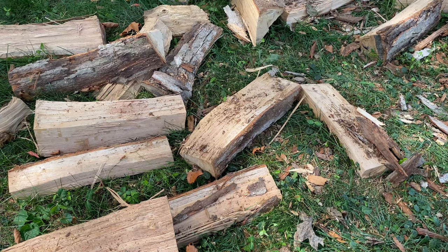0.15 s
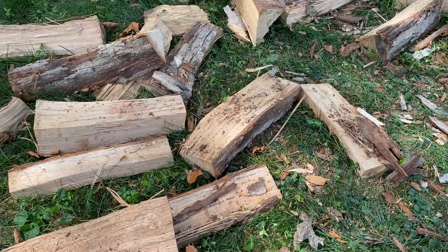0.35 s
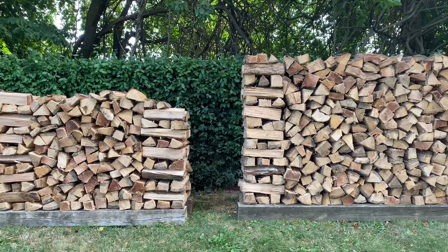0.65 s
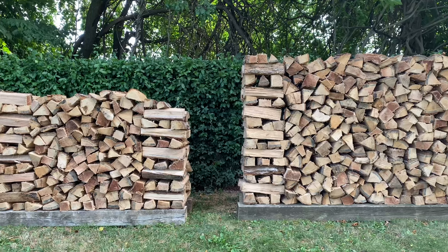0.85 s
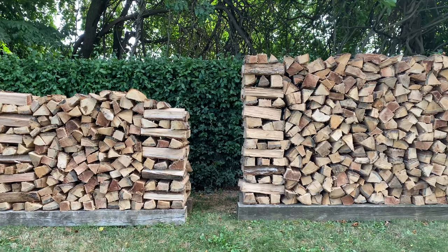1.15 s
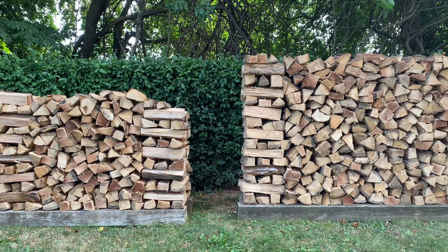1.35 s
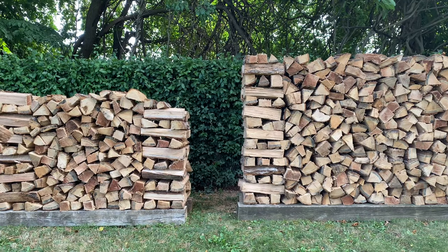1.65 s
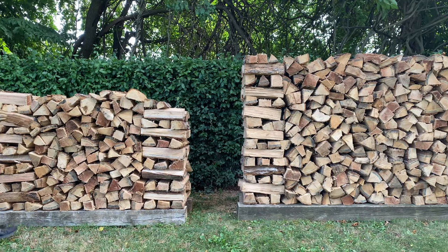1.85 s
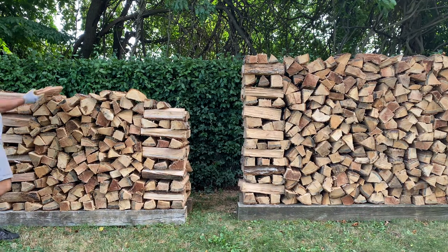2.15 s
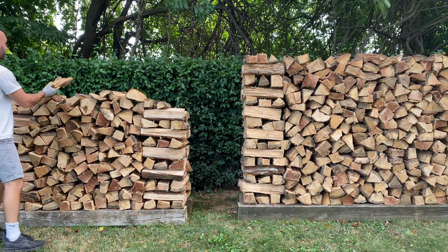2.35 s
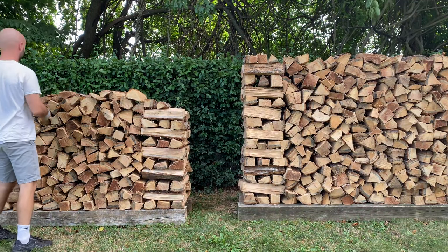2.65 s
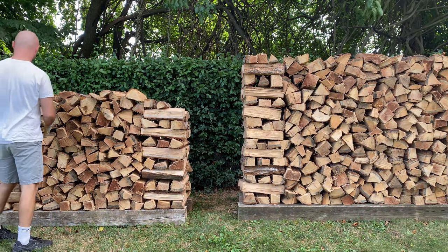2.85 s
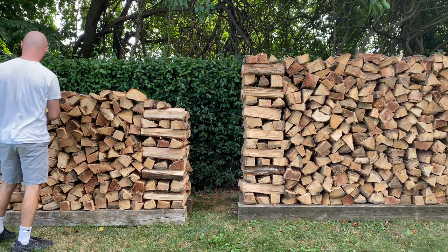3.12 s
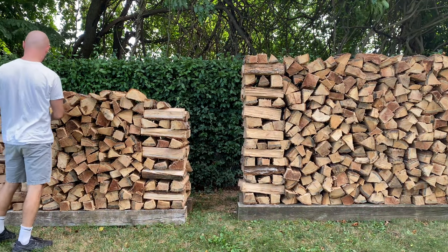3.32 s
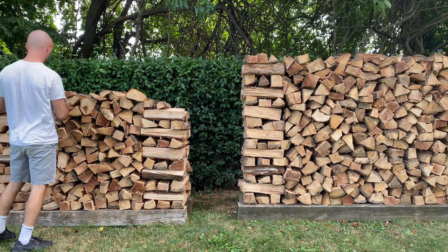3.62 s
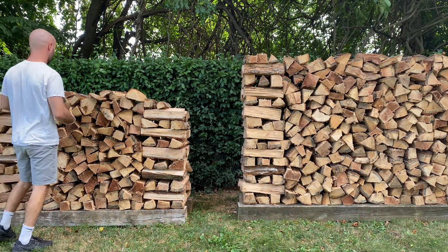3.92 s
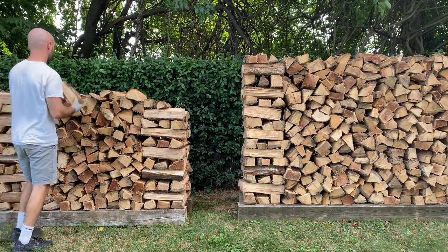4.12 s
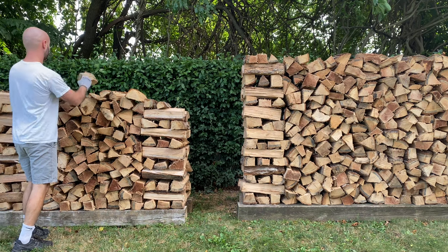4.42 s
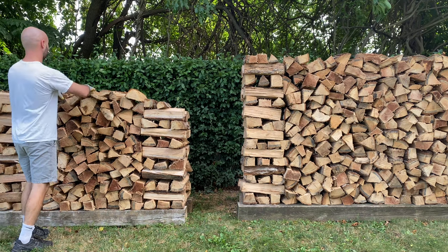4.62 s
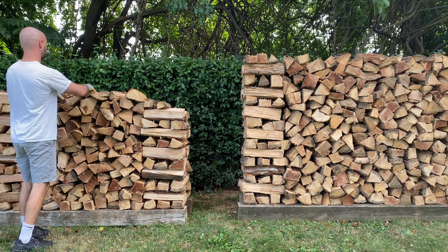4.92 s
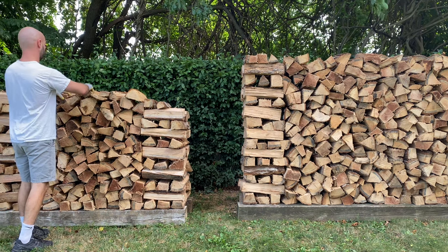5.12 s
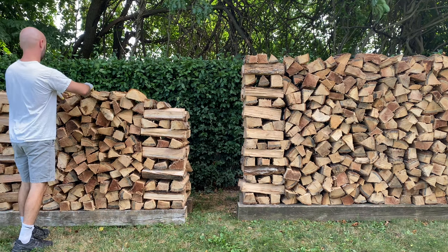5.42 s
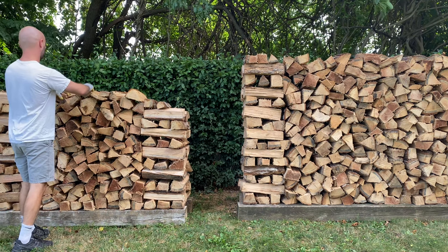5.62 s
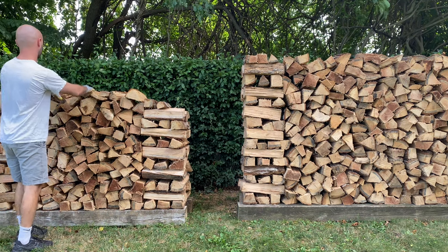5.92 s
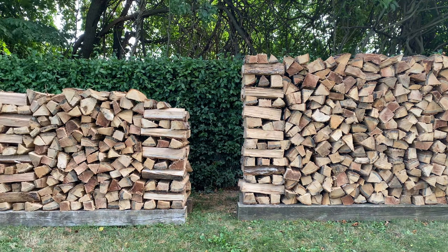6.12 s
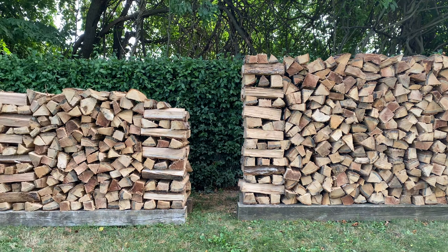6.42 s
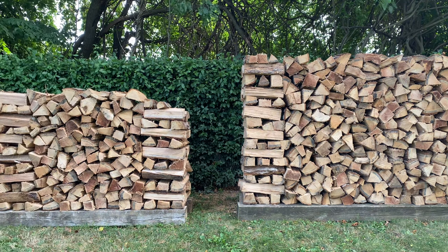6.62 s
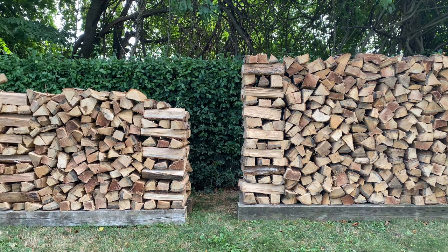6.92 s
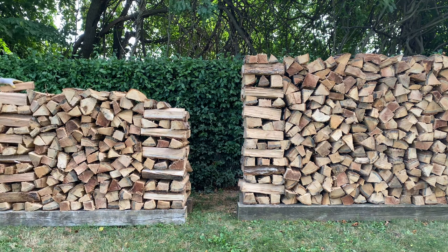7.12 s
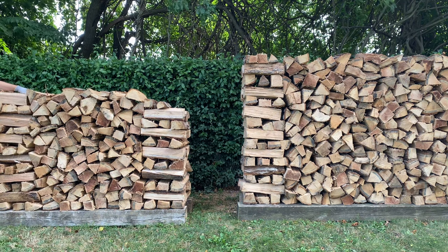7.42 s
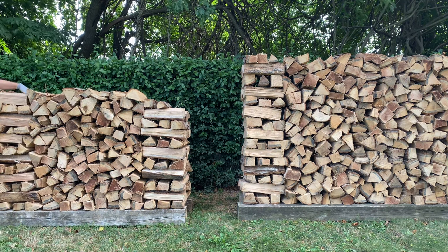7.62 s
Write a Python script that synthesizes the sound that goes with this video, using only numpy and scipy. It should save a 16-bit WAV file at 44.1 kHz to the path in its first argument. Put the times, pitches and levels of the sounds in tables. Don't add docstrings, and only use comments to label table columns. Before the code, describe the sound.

A dense, loud tumble of firewood opens: hollow clunks, low ground thuds and dry bark ticks. It stops abruptly into soft garden ambience in stereo, with passing cars and a labouring lorry that fade, high cricket trills and thin descending whistles. Wood is placed on a pile at some distance, lightly then more sharply. Finally come grass rustles, snaps, clearer birds and buffeting wind.

```python
import sys
import numpy as np
from scipy import signal
from scipy.fft import rfft, irfft, next_fast_len
from scipy.io import wavfile
from scipy.ndimage import uniform_filter1d, map_coordinates

SR = 44100
rng = np.random.default_rng(int(sys.argv[2]) if len(sys.argv) > 2 else 0)


def nominal_scale(level):
    x = np.asarray(level, float) / 20
    return 10 ** x


def dump(signal):
    limited = np.clip(np.atleast_2d(signal).T, -1, 1)
    pcm = np.round(limited * 32767).astype(np.int16)
    wavfile.write(sys.argv[1], SR, pcm)


N = 342127

# t/s, level/dB
LORRY_SWING = [
    (.59, 5),
    (1.15, -4),
    (1.75, 1),
    (3.15, 0.5),
    (3.45, -9.5),
    (4.9, -10.5),
    (6.1, -9.5),
]
# t/s, level/dB
CARS_SWING = [
    (.59, 2),
    (2.1, 0.5),
    (2.9, -3),
    (3.66, -1.5),
    (4.2, -2.5),
    (4.45, -5.5),
    (6.1, -13.5),
]
# t/s, length/s, level/dB
WIND_GUST = (7.3, 0.1, -26)


def unit(x):
    return x / np.sqrt(np.mean(x ** 2) + 1e-20)


def along(points, hz):
    f, v = np.transpose(points)
    return np.interp(np.log(hz + 1), np.log(f + 1), v, -120, -120)


def curves(rows):
    s, *cols = np.transpose(rows)
    return [np.interp(np.arange(N) / SR, s, c) for c in cols]


def wobble(rate):
    knots = rng.standard_normal(int(N * rate / SR) + 4)
    return map_coordinates(knots, [np.arange(N) * rate / SR])


def filtered(x, response):
    m = next_fast_len(N + 8192)
    return irfft(rfft(x, m) * response(np.fft.rfftfreq(m, 1 / SR)), m)[..., :N]


def ports(pair):
    # f/Hz, phase/rad
    right_leads = [(0, 0), (2410, -7), (2840, -6.5), (3450, -6.5), (6720, -6), (8100, -5), (9560, -2.5),
                   (15200, 8)]

    def shift(hz):
        phase = np.interp(hz, *np.transpose(right_leads))
        return np.exp(.5j * np.outer([-1, 1], phase))
    return filtered(pair, shift)


def lead(x, samples):
    return filtered(x, lambda hz: np.exp(1j * np.pi * np.outer([1, -1], hz) * samples / SR))


def rush(spectrum, alike, patchy_db):
    z = signal.stft(rng.standard_normal((2, N)), nperseg=512)[2]
    field = uniform_filter1d(rng.standard_normal(z.shape[1:]), 5, 0)
    field = uniform_filter1d(field, 12, 1)
    a, b = signal.istft(z * nominal_scale(patchy_db * unit(field)), nperseg=512)[1][:, :N]
    turn = np.arccos(np.clip(alike, 0, 1)) / 2
    pair = np.cos(turn) * a + np.sin(turn) * np.outer([1, -1], b)
    return unit(filtered(pair, lambda hz: nominal_scale(along(spectrum, hz))))


def add(track, s, sound):
    part = track[..., round(s * SR):round(s * SR) + sound.shape[-1]]
    part += sound[..., :part.shape[-1]]


def by_shot(*values):
    changes = (.556, 6.121)
    return np.choose(np.searchsorted(changes, np.arange(N) / SR), values)


def layer_db(levels, swing_db=0):
    first_db, settling, far_db, last_db = levels
    return by_shot(first_db - settling * np.arange(N) / SR, far_db + swing_db, last_db)


def swells(rows):
    t = np.arange(N) / SR
    return sum(nominal_scale(row[-1]) * np.exp(-((t - row[0]) / row[1]) ** 2) for row in rows)


def lows():
    # f/Hz, level/dB per Hz
    rumble_spectrum = [(15, -52), (30, -23.5), (48, -3.5), (70, -1), (110, -6), (160, -34), (300, -63)]
    drone_spectrum = [(70, -19), (130, 2), (200, -1.5), (270, -8.5), (350, -21), (800, -60)]
    rumble_levels = (-29, 10.5, -53.5, -40.5)
    drone_levels = (-25, 26.5, -50, -48)
    lorry_db, gust = curves(LORRY_SWING)[0], swells([WIND_GUST])
    rumble = nominal_scale(layer_db(rumble_levels, 0.19 * lorry_db)) + gust
    rumble = rumble * nominal_scale(4.0 + 3.6 * wobble(9)) * rush(rumble_spectrum, 0.9, patchy_db=0.86)
    drone = nominal_scale(layer_db(drone_levels, lorry_db) + 1.5) + nominal_scale(-12) * gust
    return rumble + drone * rush(drone_spectrum, 0.9, patchy_db=0.0)


def traffic():
    # f/Hz, level/dB per Hz
    roar_spectrum = [(200, 0), (400, -4.5), (800, 1), (1200, 0), (1700, -14.5), (3000, -29.5)]
    tyre_spectrum = [(700, -6), (1300, 3.5), (1900, -0.5), (2500, -7), (2900, -19), (5000, -22)]
    roar_levels = (-39.5, 36, -56.5, -51)
    tyre_levels = (-48, 46, -54, -60.5)
    # t/s, length/s, tyre centre f/Hz, level/dB
    passing = [
        (0.621, 0.66, 1027, -48),
        (1.806, 0.55, 998, -50),
        (3.049, 0.5, 847, -49.5),
        (3.707, 0.16, 1090, -69),
    ]
    likeness = (0.81, 0.71, 0.65)
    alike = by_shot(*likeness)
    hz = curves([(s, centre) for s, _, centre, _ in passing])[0]
    band = rush([(1, -1.5), (80, -13.0), (200, -13.0)], alike=0.86, patchy_db=-1.5)
    car = np.cos(2 * np.pi * np.cumsum(hz) / SR) * band
    roar = nominal_scale(layer_db(roar_levels, 0.47 * curves(LORRY_SWING)[0])) * rush(roar_spectrum, alike, patchy_db=2.0)
    tyre_gain = nominal_scale(layer_db(tyre_levels, curves(CARS_SWING)[0]) + 4.0)
    return nominal_scale(4.5) * (roar + swells(passing) * car) + tyre_gain * rush(tyre_spectrum, alike, patchy_db=1.0)


def leaves():
    # f/Hz, level/dB per Hz
    hiss_spectrum = [(300, 8), (1500, -6.5), (3000, -1.5), (5500, -4), (8000, -7.5), (9500, -9),
                     (16000, -14.5)]
    hiss_levels = (-53.5, -0.5, -68, -53.5)
    gain = nominal_scale(layer_db(hiss_levels, 0.2 * curves(CARS_SWING)[0]) + 8)
    return gain * rush(hiss_spectrum, alike=0.094, patchy_db=1.23)


def grass():
    # f/Hz, level/dB per Hz
    rustle_spectrum = [(1500, -13), (4000, -5.5), (8000, -7.5), (11000, -4), (14000, -4.5), (16000, -3)]
    rustle_levels = (-69, 3, -75, -62)
    # t/s, length/s, level/dB
    steps = [(.48, 0.029, -49), (.8, 0.13, -73), (1.3, .05, -81), (2.32, 0.099, -72), (2.51, 0.04, -74),
             (2.92, 0.087, -72), (4.15, 0.16, -80), (4.582, 0.0094, -53), (5.3, 0.54, -88),
             (6.02, 0.1, -76), (6.6, 0.087, -52), (6.84, 0.11, -50), (7.3, 0.04, -59), (7.47, 0.029, -69)]
    grains = 1 + 0.2 * np.abs(wobble(300)) ** 1.8 * nominal_scale(1.8 * wobble(30))
    rustle = unit(grains * rush(rustle_spectrum, alike=0.45, patchy_db=1.5))
    return (nominal_scale(layer_db(rustle_levels)) + swells(steps)) * nominal_scale(4.5) * rustle


def motor():
    # t/s, level/dB
    load = [(.6, -45.5), (1.05, -48), (1.2, -48), (1.36, -37), (1.8, -44.5), (2, -38), (3.2, -43),
            (4.5, -50), (5.25, -52.5), (5.4, -45), (6, -48), (6.15, -55), (6.3, -38.5), (7.76, -58)]
    hz = 110.6 * (1 + 0.0065 * wobble(5))
    turn = 2 * np.pi * np.cumsum(hz) / SR
    tone = np.sin(turn) + nominal_scale(-21) * np.sin(turn / 2)
    tone += nominal_scale(-17.0 + 1.5 * wobble(2.95)) * np.sin(turn * 3 / 2)
    return nominal_scale(curves(load)[0] + 0.31 * wobble(12)) * tone * nominal_scale([[-.6], [.6]])


def gate(per_s, at_s, quickens, sharp):
    since = np.arange(N) / SR - np.c_[list(at_s)]
    far, last = [r * u + q * u ** 2 / 2 for r, u, q in zip(per_s, since, quickens)]
    return np.abs(np.cos(np.pi * by_shot(far, far, last))) ** sharp


def crickets():
    chorus_levels = (-67, -12, -55.5, -40.5)
    # f/Hz, level/dB per Hz
    wing_spectrum = [(5800, -28), (6200, -13), (6600, -5.5), (7200, 0.5), (7600, -5), (8000, -10),
                     (8600, -18), (9500, -46)]
    # t/s, level/dB
    turning = [(.6, 1), (1.4, 1.5), (2.2, -5), (3, 1.5), (3.8, -0.5), (4.6, -1), (5.4, 1.5), (6.05, -4),
               (6.25, -1), (6.5, -1), (6.76, -6), (7.02, 1.5), (7.3, 4), (7.56, 4.5)]
    # calls per second [1/s], time of one call [t/s], quickening [1/s^2]
    trill_rate = (13.698, 13.57)
    trill_time = (.626, 6.19)
    chirp_rate = (3.93, 3.78)
    chirp_time = (.597, 6.232)
    chirp_quickening = (.0755, 0)
    t = np.arange(N) / SR
    beat = gate(trill_rate, trill_time, (0, 0), sharp=1.5)
    sag = 70 / trill_rate[0] * 2 * beat
    pulses = gate(trill_rate, trill_time, (0, 0), sharp=8.1) * nominal_scale(2.6 * wobble(3.58))
    trill = pulses * np.sin(2 * np.pi * 7520 * t + sag + 0.95 * wobble(70))
    strokes = 0.66 + 0.32 * np.sin(2 * np.pi * 38 * t)
    chirp = gate(chirp_rate, chirp_time, chirp_quickening, sharp=2.3) * strokes * nominal_scale(curves(turning)[0])
    chirp = chirp * np.sin(2 * np.pi * 6645 * t + 0.98 * wobble(40))
    crowd = nominal_scale(1 * np.roll(beat, 700)) * rush(wing_spectrum, alike=0.77, patchy_db=1.4)
    chorus = ports(crowd + nominal_scale(-8.5) * unit(chirp))
    return nominal_scale(layer_db(chorus_levels)) * (chorus + nominal_scale(-6.0) * lead(unit(trill), samples=-0.82))


def whistle(call, partials, hoarse, joins=0, split_db=-60):
    s, hz, db = np.transpose(call)
    t = np.arange(s[0], s[-1], 1 / SR)
    share = np.linspace(0, 1, len(t))
    from_split = (share - 0.84) / 0.075
    turn = 2 * np.pi * np.cumsum(np.interp(t, s, hz)) / SR
    turn = turn + hoarse * np.exp(-from_split ** 2 / 2) * wobble(250)[:len(t)]
    under_db = db.max() - np.interp(t, s, db)
    side = nominal_scale(0.7 * under_db) * np.clip((share - joins) / 0.05, 0, 1)
    voice = 0
    for ratio, level in partials:
        voice = voice + nominal_scale(level) * (side if ratio != 1 else 1) * np.sin(ratio * turn)
    split = nominal_scale(split_db) * np.exp(-from_split ** 2) * np.sin(turn - 2 * np.pi * 260 * t)
    return nominal_scale(db.max() + 7.5) * signal.windows.tukey(len(t), .08) * (nominal_scale(-under_db) * voice + split)


def bird():
    # t/s, f/Hz, level/dB
    glides = [
        [(1.465, 3473, -69), (1.487, 3480, -64), (1.525, 3540, -63), (1.541, 3513, -71), (1.559, 3580, -65),
         (1.567, 3570, -71), (1.697, 3380, -52.5), (1.731, 3400, -52), (1.87, 3330, -77)],
        [(2.29, 3282, -78), (2.296, 3519, -76), (2.326, 3650, -73), (2.386, 3630, -77), (2.396, 3598, -66),
         (2.43, 3590, -70), (2.59, 3394, -58), (2.668, 3350, -68), (2.7, 3240, -73)],
        [(3.745, 3580, -77), (3.797, 3620, -64), (3.837, 3590, -66), (3.863, 3570, -79), (3.975, 3388, -58),
         (4.033, 3300, -70), (4.041, 3275, -58), (4.133, 3240, -69), (4.15, 3346, -68)],
        [(6.655, 3510, -53), (6.693, 3667, -59), (6.759, 3650, -52.5), (6.847, 3538, -46), (6.866, 3550, -57),
         (6.929, 3404, -42), (6.952, 3402, -52), (7.013, 3238, -45.5), (7.05, 3317, -68)],
        [(7.256, 3560, -57), (7.328, 3680, -52), (7.356, 3669, -59), (7.372, 3620, -49), (7.48, 3526, -48),
         (7.497, 3500, -57), (7.518, 3465, -43), (7.585, 3320, -48.5), (7.645, 3350, -46)],
    ]
    # third harmonic/dB, sixth/dB, share of the call before they join, split voice/dB
    voices = [
        (-24, -27, 0, -12),
        (-15, -23, 0, -10),
        (-18, -25, 0, -10),
        (-13.5, -18.5, 0.16, -9),
        (-11.5, -17, 0.25, -12),
    ]
    # t/s, f/Hz, level/dB
    others = [
        [(6.81, 1655, -57), (6.87, 1640, -49), (6.92, 1590, -57), (6.97, 1525, -66)],
        [(1.87, 4180, -80), (1.92, 4140, -75), (1.94, 4130, -82)],
    ]
    song = np.zeros(N)
    for call, (third_db, sixth_db, joins, split_db) in zip(glides, voices):
        partials = [(1, 0), (3 / 4, third_db), (6 / 4, sixth_db)]
        add(song, call[0][0], whistle(call, partials, hoarse=1.26, joins=joins, split_db=split_db))
    for call in others:
        add(song, call[0][0], whistle(call, [(1, 0)], hoarse=.6))
    song = song * nominal_scale(0.98 * wobble(35) + 2.95 * wobble(75))
    tail = rng.standard_normal((2, 9000)) * nominal_scale(-60 * np.arange(9000) / SR / 0.42)
    echoes = signal.fftconvolve(song[None], tail / np.linalg.norm(tail[0]), axes=1)[:, :N]
    return lead(song, samples=10.2) + nominal_scale(-7) * echoes


def snaps():
    # t/s, peak level/dB, duller part level/dB
    breaks = [(0.4018, -30, -25), (.409, -39, -9), (0.415, -41.5, 12), (0.457, -40, -6), (0.47, -34, -23.5),
              (2.139, -48, -14), (2.3476, -54, -8), (2.516, -63, 2), (6.5478, -33.5, -9), (6.602, -37, -13),
              (6.6972, -41, -9), (6.8254, -42, -5), (6.832, -29, -18), (6.905, -33, -3), (7.472, -34, 0)]
    # f/Hz, level/dB per Hz
    bark_spectrum = [(1500, -8), (4000, -5.5), (8000, -1), (11000, -1), (13000, -2), (16000, -19)]
    bright, dull, t = np.zeros(N), np.zeros(N), np.arange(SR // 20) / SR
    for s, db, dull_db in breaks:
        burst = nominal_scale(db - 60 * t / 0.031) * rng.standard_normal(len(t))
        add(bright, s, burst)
        add(dull, s, nominal_scale(dull_db) * burst)
    bright = filtered(bright, lambda hz: nominal_scale(along(bark_spectrum, hz)))
    return bright + filtered(dull, lambda hz: 1 / (1 + 1.5j * (hz / 6000 - 6000 / (hz + 1))))


def stacking():
    # t/s, peak level/dB, hardness/dB, middle mode level/dB
    landings = [(2.487, -42, 7, 9), (2.516, -26, 2.5, -2), (2.522, -31.5, 7, 4), (4.556, -31.5, 2.5, 2),
                (4.564, -35.5, 0, -6), (4.576, -23, 13, 11), (4.579, -29, 2, 3), (4.591, -30.5, -2, 2),
                (4.582, -17.5, -0.5, -19), (4.600, -34, 4, 8), (4.612, -38, -4, 0), (4.635, -41, 1, 6),
                (4.649, -43, 3, 0), (4.658, -44, 5, 0.5), (4.667, -44, 4, 2), (7.477, -36, -7.5, -7)]
    # f/Hz, level/dB, time to fall 60 dB/s
    log_modes = [
        [(447, 4, 0.037), (680, -1, 0.02), (1160, -1, 0.021), (900, -4, .015), (1810, -10, 0.02),
         (2070, -13, .018), (3800, -14, .012)],
        [(266, -16, .025), (320, -10.5, 0.053), (400, 4, 0.028), (501, -2.5, 0.034), (660, -1.5, 0.019),
         (1047, -5.5, 0.058), (1485, -11, 0.023), (1950, -27, 0.036)],
    ]
    track, fibres, t = np.zeros(N), np.zeros(N), np.arange(SR // 8) / SR
    for s, db, hard_db, middle_db in landings:
        loose = 0.12 * np.clip((-24 - db) / 12, 0, 1)
        ring = 0
        for hz, level, t60 in log_modes[int(s > 4)]:
            share_db = -hard_db if hz < 500 else middle_db if hz < 800 else hard_db
            pitch = hz * (1 + loose * rng.normal())
            ring = ring + nominal_scale(level + share_db - 60 * t / t60) * np.sin(2 * np.pi * pitch * t)
        crack = uniform_filter1d(rng.standard_normal(len(t)), size=3)
        crack = nominal_scale(-11 + .1 * hard_db + 3.0 - 60 * t / 0.018) * crack
        add(track, s, nominal_scale(db - 1.0) * (ring * (1 - np.exp(-t / 0.0024)) + crack))
        add(fibres, s, nominal_scale(db - 20.5 + 0.26 * hard_db - 60 * t / 0.029) * rng.standard_normal(len(t)))
    crushed = filtered(fibres, lambda hz: 1 / (1 + 1.2j * (hz / 3670 - 3670 / (hz + 1))) ** 2)
    track = track + nominal_scale(8.0) * crushed
    tail = rng.standard_normal((2, len(t))) * nominal_scale(-60 * t / 0.087) * (1 - np.exp(-t / 0.01))
    murmur = signal.fftconvolve(track[None], tail / np.linalg.norm(tail[0]), axes=1)[:, :N]
    return lead(track, samples=5.4) * nominal_scale([[1.2], [-1.2]]) + nominal_scale(-9.5) * murmur


def thuds(table, t60, pan_db, spread, sag, attack_s):
    low, t = np.zeros((2, N)), np.arange(SR // 8) / SR
    sag_s = 0.0058
    stretched = t + sag * sag_s * (1 - np.exp(-t / sag_s))
    for s, db, hz in table:
        swing = np.sin(2 * np.pi * hz * stretched + rng.normal(0, spread, (2, 1)))
        swing = swing * (1 - np.exp(-t / attack_s)) ** 2
        fading_db = 60 * t / t60 * (hz / 100) ** 0.48
        add(low, s, nominal_scale(db + 3.5 - fading_db) * swing)
    return filtered(low * nominal_scale([[pan_db / 2], [-pan_db / 2]]), lambda hz: (1j * hz / (40 + 1j * hz)) ** 2)


def buffets():
    # t/s, peak level/dB, f/Hz
    puffs = [(7.182, -19, 113), (7.202, -6, 43.5), (7.216, -4, 65), (7.236, -20, 70), (7.266, -8.5, 146),
             (7.289, -18, 67), (7.314, -9, 138), (7.324, -12, 58.5), (7.359, -16, 79.4), (7.386, -5, 59),
             (7.43, -30, 160), (7.455, -21, 40.7), (7.478, -12, 72.6), (7.614, -21.5, 67.4),
             (7.55, -28, 60.5), (7.69, -27, 70)]
    return thuds(puffs, t60=0.094, pan_db=1.5, spread=0.74, sag=0.045, attack_s=0.003)


def clunks():
    # t/s, peak level/dB, f/Hz
    hollow = [(.005, -17, 330), (.027, -13, 273), (.044, -11.5, 503.8), (.052, -2.5, 279), (.059, -9, 330),
              (.094, -19, 249), (.098, -16, 405), (.112, -13, 300), (.131, -10.5, 236), (.132, -18, 503),
              (.152, -7.5, 330), (.158, -16, 404), (.171, -11.5, 326), (.185, -19, 500), (.198, -22, 380),
              (.213, -11, 320), (.23, -20, 435), (.24, -26, 328), (.266, -21, 320), (.281, -26, 403),
              (.296, -23, 300), (.31, -31, 430), (.326, -32, 378), (.352, -28, 237), (.3595, -21, 305.7),
              (.372, -18, 410), (.386, -27, 403), (.404, -33, 380), (.428, -29, 297), (.478, -32.5, 402),
              (.487, -31, 468), (.498, -24.5, 237)]
    return nominal_scale(0.5) * thuds(hollow, t60=0.06, pan_db=-1.0, spread=0.63, sag=0.087, attack_s=0.002)


def smacks():
    # t/s, peak level/dB, f/Hz
    flat_hits = [
        (.0905, -1.5, 152),
        (.3625, -2, 231),
        (7.317, -17, 126),
    ]
    return thuds(flat_hits, t60=0.029, pan_db=-.6, spread=.15, sag=0.44, attack_s=0.0014)


def tumble():
    # t/s, peak level/dB, f/Hz
    falls = [(0.004, -26, 153), (0.038, -32, 133), (0.061, -14, 157), (0.072, -5.5, 64.6),
             (0.089, -25, 83.4), (0.111, -10, 86.1), (0.133, -7.5, 142), (0.163, -6, 128),
             (0.178, -4.5, 78), (0.192, -12, 62.6), (0.212, 1, 86), (0.239, -20, 219), (0.267, -28, 83.4),
             (0.294, -31, 86.1), (0.33, -12, 62.15), (0.351, -7.5, 112.7), (0.383, -12, 76.6),
             (0.408, -14.5, 140), (0.428, -14.5, 87), (0.48, -22, 61.5), (0.509, -17.5, 104)]
    return thuds(falls, t60=0.041, pan_db=-2.5, spread=0.11, sag=.1, attack_s=0.0017)


def knocks():
    # t/s, peak level/dB, f/Hz, hard edge level/dB
    clashes = [(0, -51, 1464, 8), (.013, -35, 774, 0), (.028, -37, 1184, 8), (.038, -17.5, 970, 0),
               (.045, -21, 960, 0), (.056, -25, 1330, -2), (.059, -15.5, 840, 0), (.07, -19.5, 664, -6),
               (.084, -21, 680, 0), (.089, -24, 785, -6), (.089, -26, 1290, 0), (.098, -18, 754, 0),
               (.105, -38, 1378, -2), (.109, -23, 780, -6), (.114, -23, 870, -4), (.144, -13, 610, 5),
               (.149, -17, 830, 8), (.157, -22, 720, -4), (.163, -37, 1470, 4), (.165, -10.5, 616, -6),
               (.171, -14, 844, -4), (.194, -15, 740, -4), (.194, -20.5, 1029, 0), (.199, -14.5, 700, -6),
               (.212, -20, 1015, 0), (.231, -27, 825, 5), (.253, -42, 1141, 0), (.268, -24, 590, 0),
               (.279, -43, 926, 0), (.309, -31, 960, -2), (.322, -40, 1030, -6), (.341, -30, 581, -2),
               (.36, -18.5, 900, 12), (.36, -30, 1420, 12), (.374, -26, 805, 0), (.384, -35, 698, 3),
               (.395, -35, 560, 0), (.406, -27, 540, 0), (.424, -27.5, 690, 0), (.425, -36, 900, 0),
               (.346, -30, 500, 0), (.072, -21, 800, 0), (.119, -30, 1060, 6), (.486, -36, 805, 0)]
    # f/Hz, level/dB
    wood_spectrum = [(200, -4), (400, 12), (900, 4), (1400, -11.5), (2500, -23), (6000, -58)]
    # last one t/s, level/dB, fading/(dB/s)
    rattle = (0.45, -36, 25)
    ring, burst, tick = np.zeros((3, 2, N))
    t = np.arange(SR // 8) / SR
    last_s, rattle_db, fading = rattle
    when, strength, pitch = rng.random((70, 3)).T
    small_db = rattle_db - fading * last_s * when + 6 * strength
    small = np.c_[last_s * when, small_db, 500 + 900 * pitch, np.full(70, -6)]
    for s, db, hz, edge_db in [*clashes, *small]:
        shape = nominal_scale(db - 60 * t / 0.028) * (1 - np.exp(-t / 0.00062))
        phase = rng.normal(0, 0.2) + np.c_[[1, -1]] * rng.uniform(0.54, 1.22)
        add(ring, s, shape * np.sin(2 * np.pi * hz * t + phase))
        add(burst, s, nominal_scale(db - 60 * t / .022) * rng.standard_normal((2, len(t))))
        add(tick, s, nominal_scale(db - 17 + edge_db - 60 * t / .007) * rng.standard_normal((2, len(t))))

    def woody(hz):
        wide = 1 / (1 + (330 / (hz + 1)) ** 3)
        return nominal_scale(along(wood_spectrum, hz)) * [hz ** 0, wide]
    mid, side = filtered(burst, woody)
    tick = filtered(tick, lambda hz: 1 / (1 + 1j * hz / 2200) ** 2)
    return ring + nominal_scale(2.0) * np.array([mid + side, mid - side]) + tick


def scene():
    # t/s, gain
    fades = [
        (.525, 1.17),
        (.556, 0.0055),
        (.59, 0.94),
        (6.08, 1.05),
        (6.121, 0.0039),
        (6.145, 0.15),
        (6.2, 0.6),
        (6.27, 0.92),
        (6.4, 0.83),
    ]
    far = ports(lows() + traffic() + leaves() + grass() + snaps()) + crickets() + motor() + bird()
    near = stacking() + buffets() + clunks() + smacks() + tumble() + knocks()
    return (far + near) * curves(fades)[0]


def band_limit(x):
    return signal.sosfilt(signal.butter(12, 16520, fs=SR, output="sos"), x)


def record(dry):
    # from f/Hz, to f/Hz, jumpiness in bands
    mid_gaps = [
        (8330, 9600, .6),
        (12450, 13800, .6),
        (15760, 23000, .5),
    ]
    side_gaps = [
        (9950, 11850, .9),
        (14650, 23000, .35),
    ]
    sharp_blows = [
        .403,
        4.578,
        6.833,
    ]
    hz, t, z = signal.stft([dry[0] + dry[1], dry[0] - dry[1]], SR, nperseg=2048)
    hz = hz[:, None]
    band = 32 * SR / 2048 / 2
    calm = np.min(np.abs(t[:, None] - sharp_blows), axis=1) > .012
    for k, gaps in enumerate([mid_gaps, side_gaps]):
        for lo, hi, jumpy in gaps:
            jump = uniform_filter1d(rng.standard_normal((2, len(t))), size=2)
            jump = band * np.round(jumpy * jump)
            inside = (hz > lo + jump[0]) & (hz < hi + .6 * jump[1])
            z[k] *= ~(inside & (calm | (k == 0) | (hz > 16000)))
    mid, side = signal.istft(z, SR, nperseg=2048)[1][:, :N] / 2
    return band_limit(np.array([mid + side, mid - side]))


dry = scene()
out = record(dry)
dump(out)
```